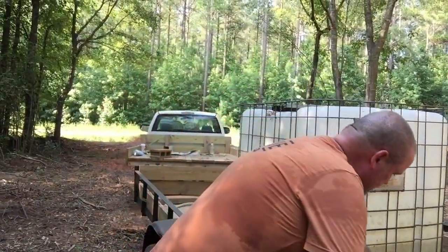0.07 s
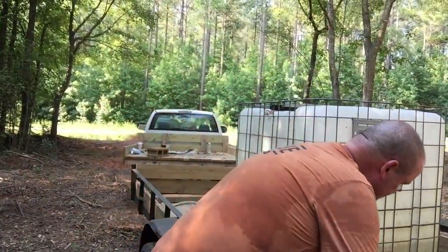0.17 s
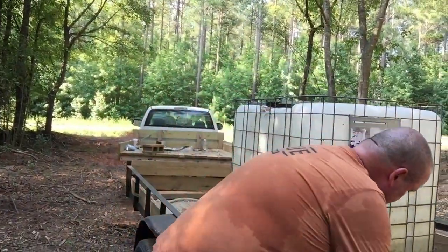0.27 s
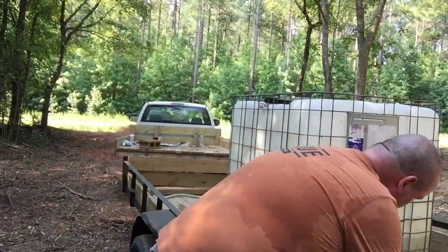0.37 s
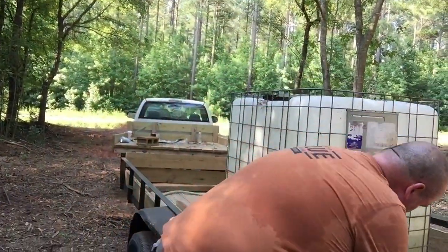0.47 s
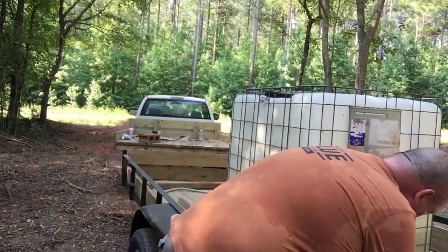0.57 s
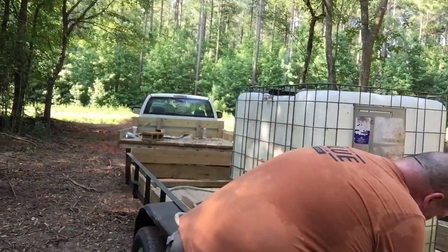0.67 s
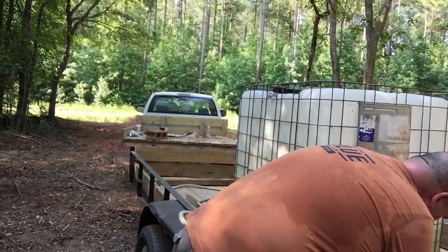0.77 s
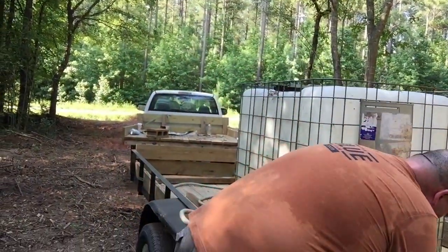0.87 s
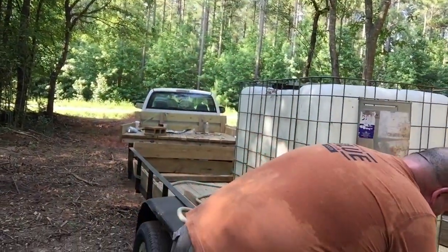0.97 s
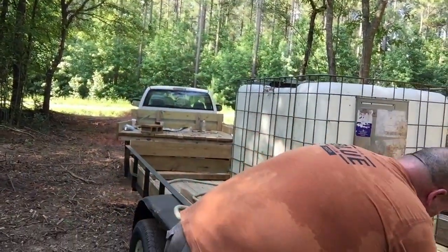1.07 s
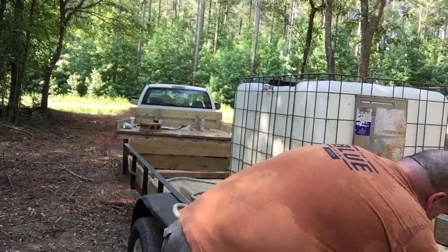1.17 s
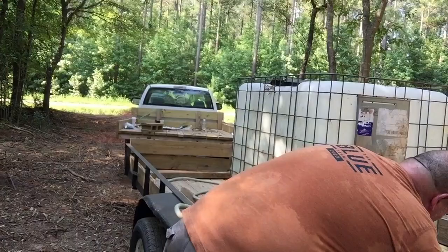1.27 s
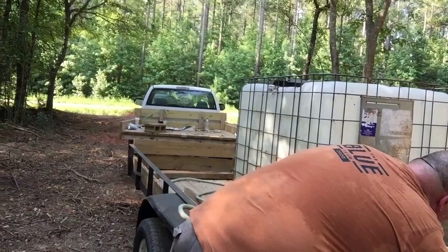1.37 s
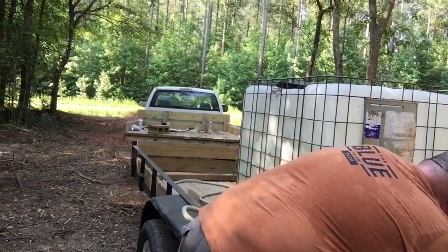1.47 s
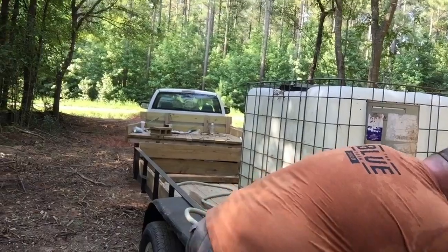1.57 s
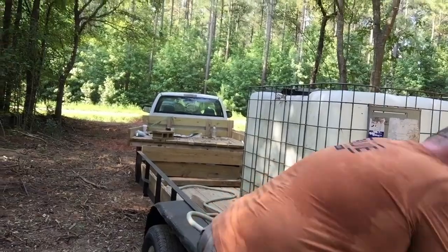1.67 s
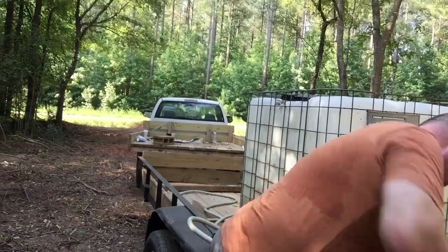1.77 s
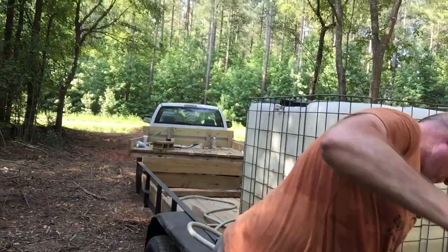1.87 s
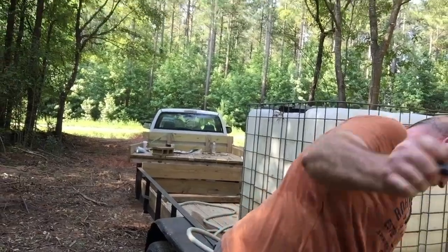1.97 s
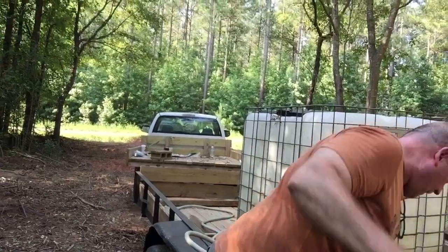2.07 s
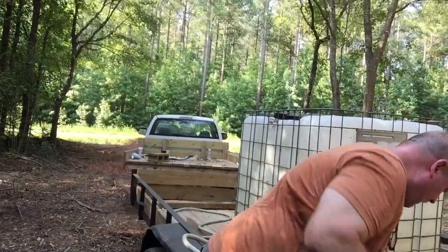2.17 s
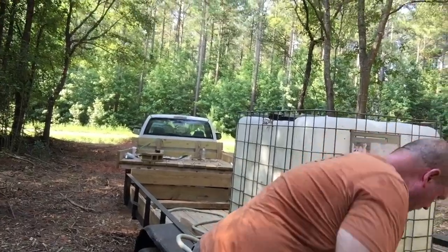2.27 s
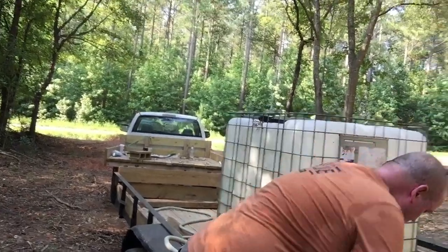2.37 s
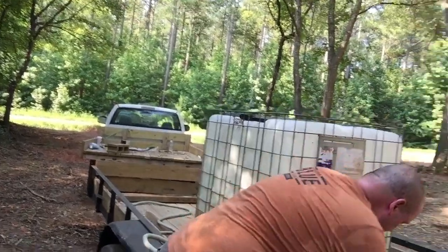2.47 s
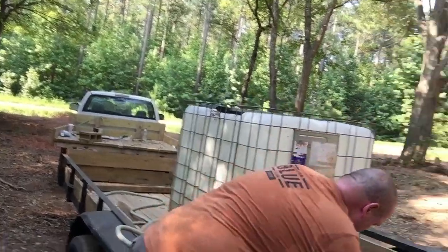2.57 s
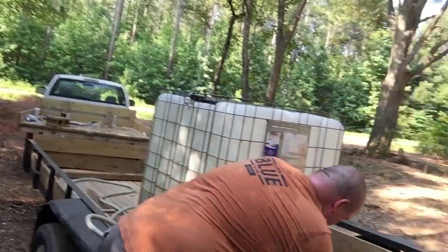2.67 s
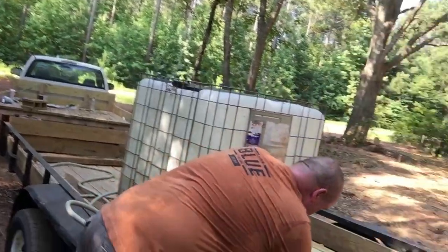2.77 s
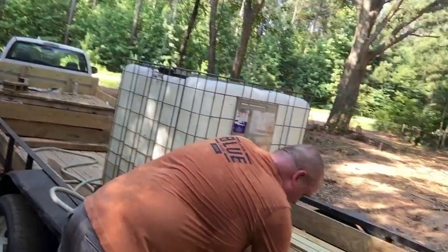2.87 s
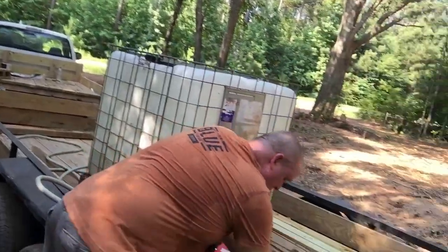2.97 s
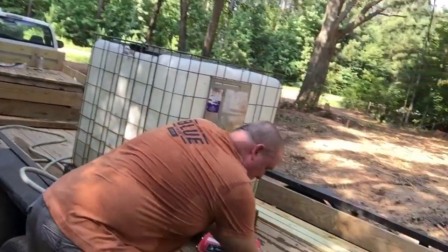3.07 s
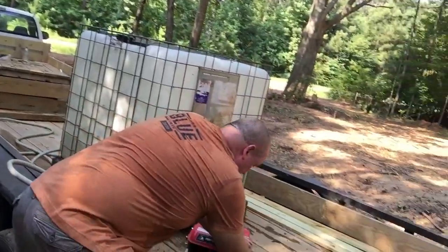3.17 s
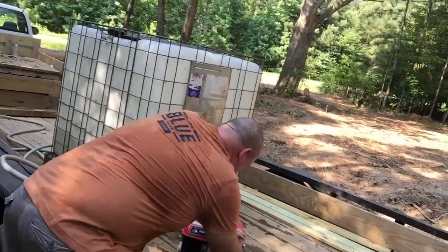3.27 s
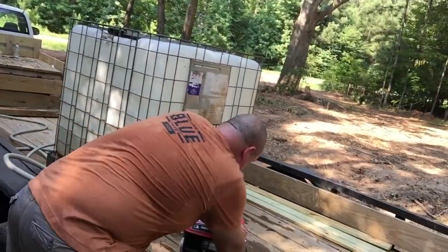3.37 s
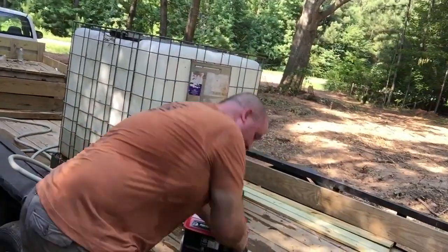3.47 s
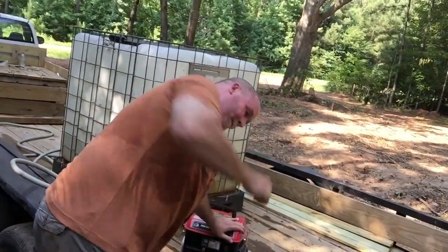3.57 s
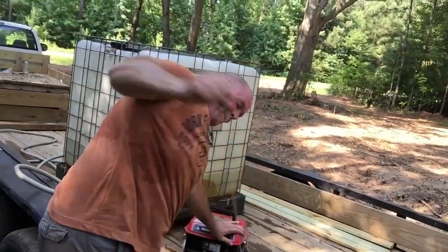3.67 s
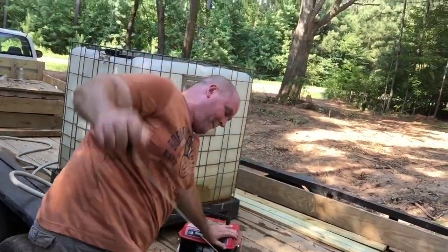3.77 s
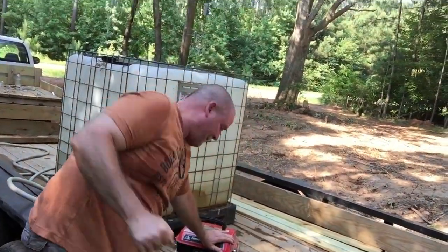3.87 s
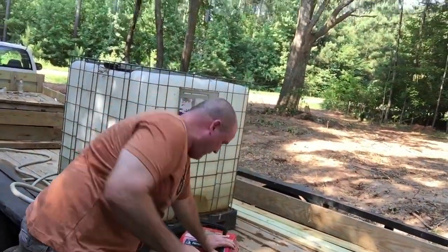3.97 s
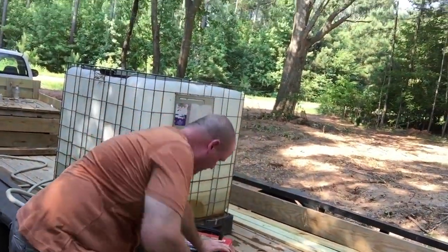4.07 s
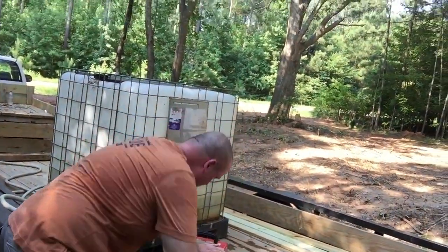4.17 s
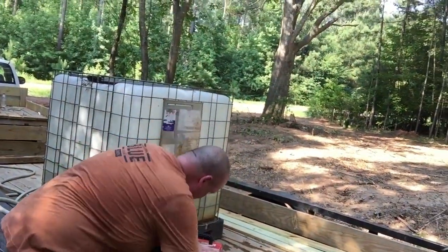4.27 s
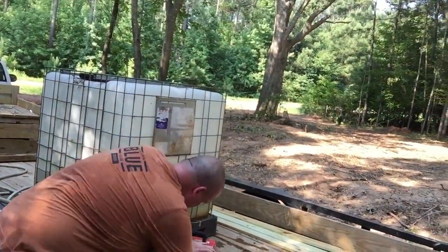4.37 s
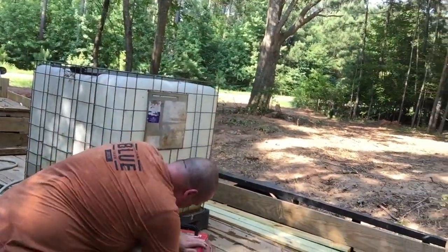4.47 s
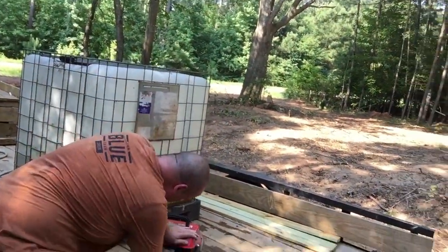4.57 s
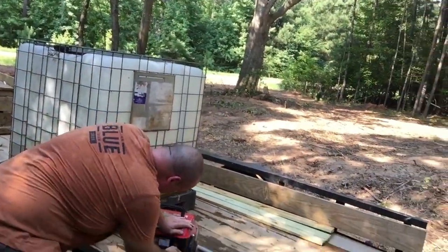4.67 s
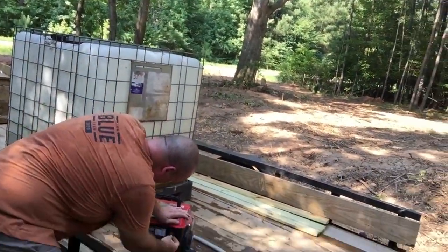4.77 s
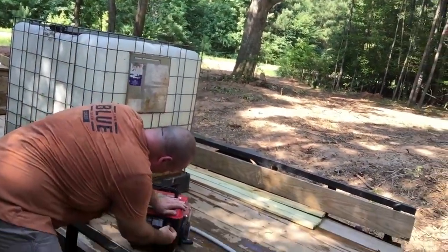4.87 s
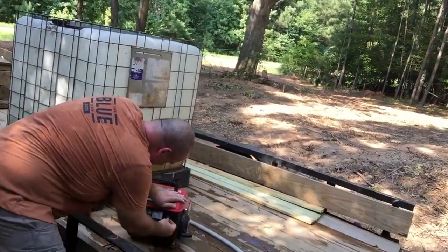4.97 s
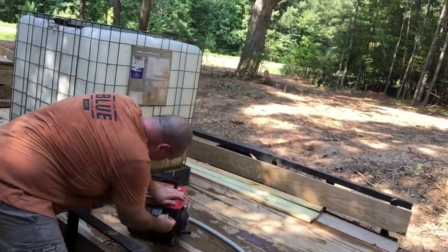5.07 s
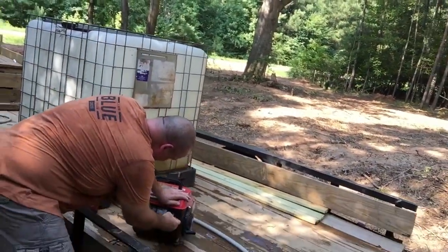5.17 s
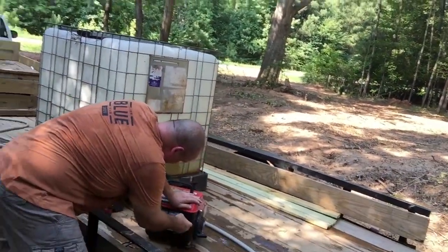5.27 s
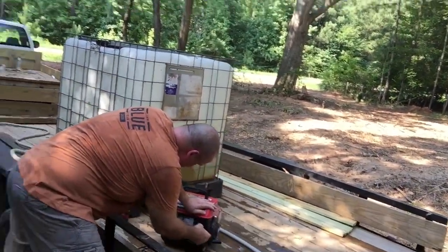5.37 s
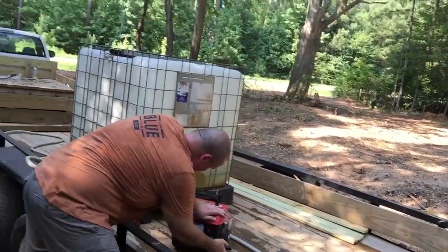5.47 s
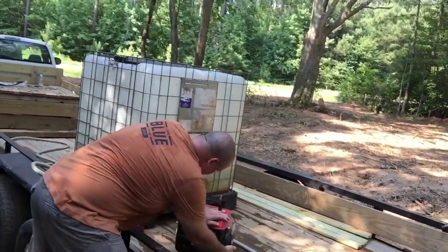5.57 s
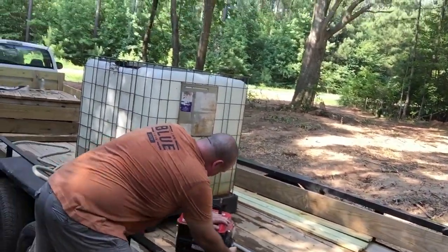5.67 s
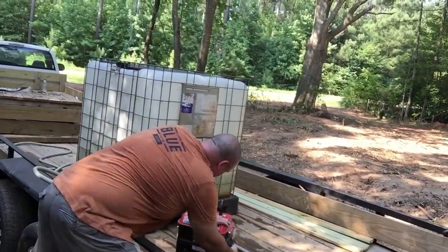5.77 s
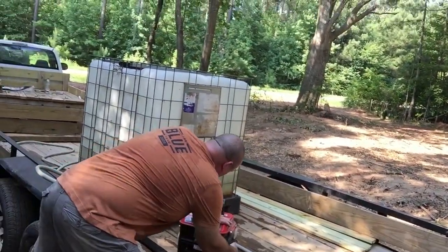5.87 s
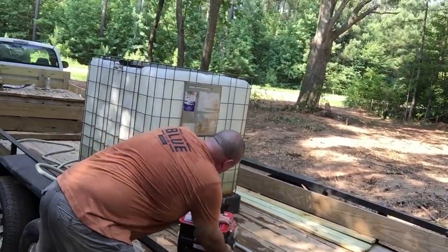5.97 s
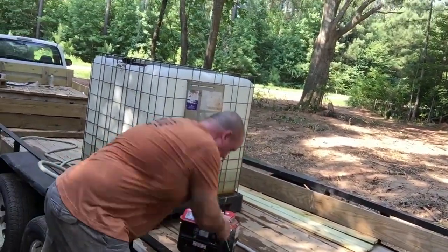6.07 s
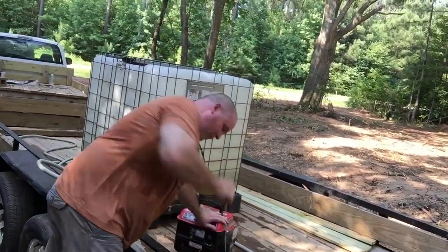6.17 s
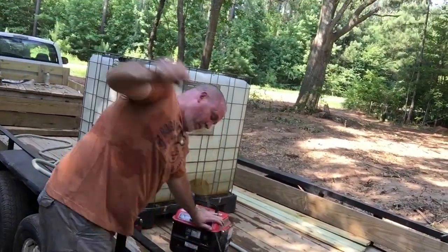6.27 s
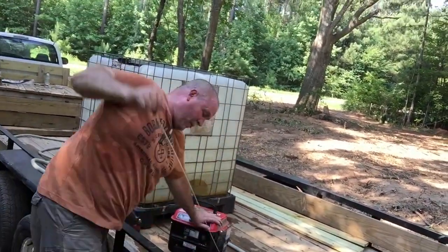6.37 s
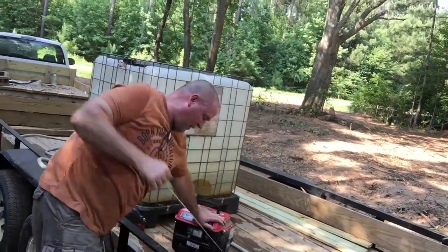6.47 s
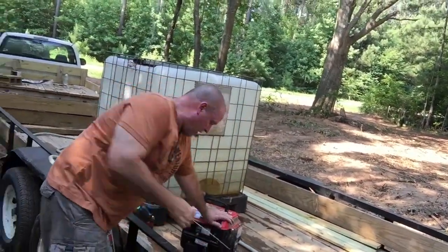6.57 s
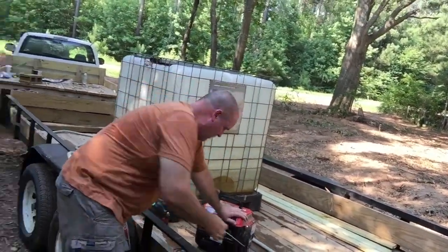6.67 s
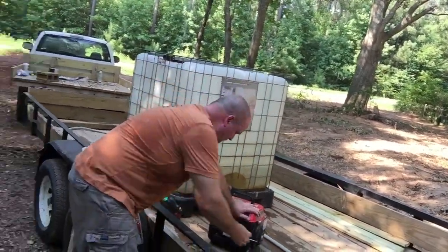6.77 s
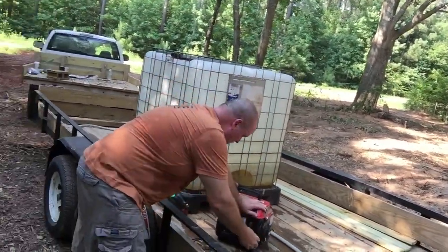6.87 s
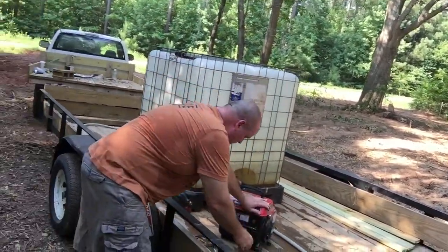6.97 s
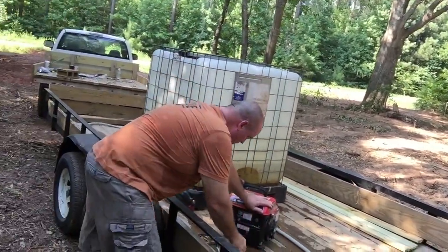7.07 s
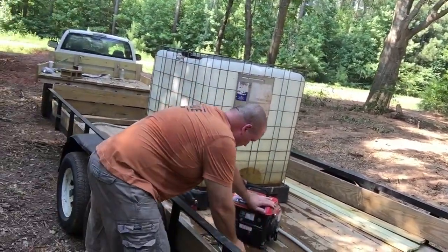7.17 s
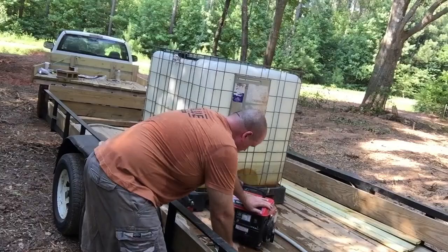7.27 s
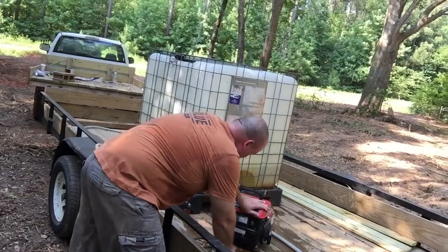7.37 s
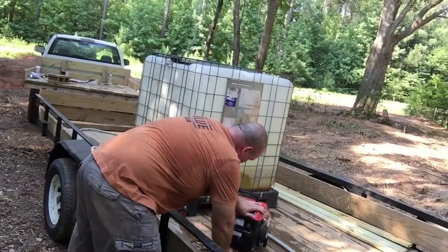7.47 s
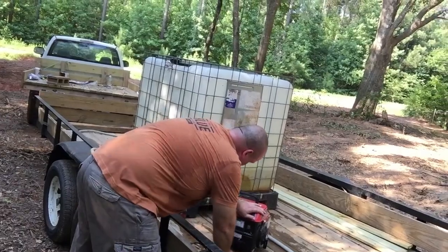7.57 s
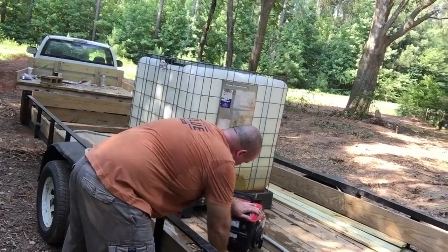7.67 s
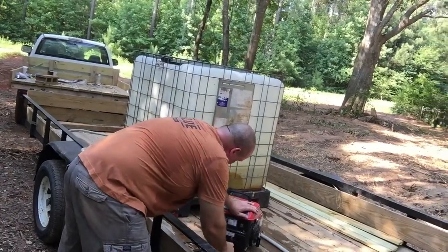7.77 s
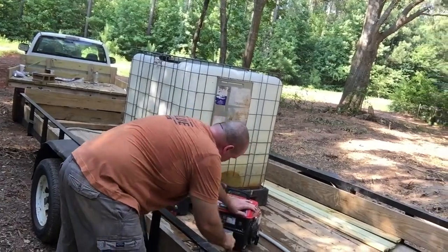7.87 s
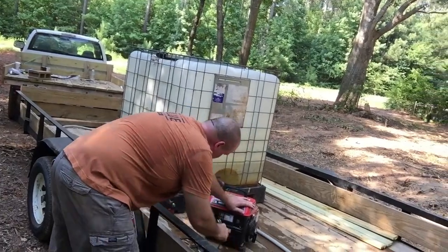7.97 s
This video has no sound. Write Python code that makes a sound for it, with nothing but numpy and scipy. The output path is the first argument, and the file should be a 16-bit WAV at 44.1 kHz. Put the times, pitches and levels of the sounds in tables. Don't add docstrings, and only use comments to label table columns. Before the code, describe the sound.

A small petrol engine is pull-started outdoors, two rasping cranks sputtering down to silence, then a third catches, revs high and settles into running.

```python
import sys
import numpy as np
from scipy import signal
from scipy.fft import rfft, irfft
from scipy.io import wavfile
from scipy.ndimage import uniform_filter1d

SR = 44100
rng = np.random.default_rng(int(sys.argv[2]) if len(sys.argv) > 2 else 0)


def persist_wave(psi):
    counts = np.round(np.clip(psi, -1, 1) * 32767).astype(np.int16)
    wavfile.write(sys.argv[1], SR, np.atleast_2d(counts).T)


def voltage_ratio(decibels):
    exponent = np.asarray(decibels, float) / 20
    return 10 ** exponent


N = 352800


def unit(x):
    return x / np.sqrt(np.mean(x ** 2) + 1e-20)


def noise(n=N):
    return rng.standard_normal(n)


def filtered(x, order, hz, kind="low"):
    return signal.sosfilt(signal.butter(order, hz, kind, fs=SR, output="sos"), x)


def smooth(x, length_s):
    return uniform_filter1d(x, int(length_s * SR))


def swell(x, length_s):
    bump = signal.windows.hann(int(length_s * SR))
    return signal.fftconvolve(x, bump / bump.sum())[:N]


def curve(rows, column, outside=-120):
    rows = np.array(rows)
    return np.interp(np.arange(N) / SR, rows[:, 0], rows[:, column], outside, outside)


def drift(rate_hz):
    sos = signal.butter(2, rate_hz, fs=SR / 20, output="sos")
    slow = signal.sosfilt(sos, noise(N // 20 + 3001))[3000:]
    return np.interp(np.arange(N) / 20, np.arange(len(slow)), unit(slow))


def clicks(times, sizes):
    out = np.full(N, 1e-18)
    np.add.at(out, np.clip((np.asarray(times) * SR).astype(int), 0, N - 1), sizes)
    return out


def ring(x, hz, t60_s):
    r, w = voltage_ratio(-60 / (t60_s * SR)), 2 * np.pi * hz / SR
    return signal.lfilter([0, np.sin(w)], [1, -2 * r * np.cos(w), r * r], x)


def body(x, modes):
    def through(v):
        return sum(voltage_ratio(db) * ring(v, hz, np.log(1000) / np.pi / width) for hz, width, db in modes)
    return through(x) / np.sqrt(np.sum(through(clicks([0], 0.84)[:8192]) ** 2))


def coloured(spectrum, patchy_db):
    log_hz = np.log(np.maximum(np.arange(N // 2 + 1) * SR / N, 1))
    at, level_db = np.log(np.array(spectrum)[:, 0]), np.array(spectrum)[:, 1]
    shaped = rfft(noise()) * voltage_ratio(np.interp(log_hz, at, level_db, -90, -90))
    octave = np.log(2)
    out = 0
    for centre in np.arange(at[0], at[-1] + octave, octave):
        share = np.clip(1 - abs(log_hz - centre) / octave, 0, 1)
        out = out + irfft(shaped * share, N) * voltage_ratio(patchy_db * drift(28.6))
    return unit(out)


# t/s, turns so far
FAILED_PULL_1 = [(1.785, 0), (1.886, 2), (1.968, 4), (2.048, 6), (2.138, 8), (2.245, 10), (2.38, 12),
                 (2.47, 13), (2.59, 14)]
FAILED_PULL_2 = [(3.564, 0), (3.609, 1), (3.648, 2), (3.683, 3), (3.744, 5), (3.806, 7), (3.872, 9),
                 (3.943, 11), (4.02, 13), (4.106, 15), (4.204, 17), (4.322, 19), (4.398, 20), (4.508, 21),
                 (4.61, 22)]
# t/s, speed/turns per s
RUN = [(6.18, 23.1), (6.27, 38.6), (6.39, 54.7), (6.49, 68.1), (6.606, 78.2), (6.67, 77.7), (6.87, 68.7),
       (7.132, 60.5), (7.338, 58.2), (7.602, 61.1), (7.838, 61.0), (8.0, 60.2)]


def turn_times():
    coasting = []
    for pull in (FAILED_PULL_1, FAILED_PULL_2):
        s, turns = np.transpose(pull)
        fit, every = np.polyfit(turns, s, deg=7), np.arange(turns[-1] + 1)
        misfit = np.interp(every, turns, s - np.polyval(fit, turns))
        coasting += list(np.polyval(fit, every) + misfit)
    angle = np.cumsum(curve(RUN, 1, outside=0)) / SR
    firing = np.flatnonzero(np.diff(np.floor(angle), prepend=0)) / SR
    times = np.concatenate([coasting, [RUN[0][0]], firing])
    return times, np.arange(len(times)) >= len(coasting), angle


# t/s, level/dB
BURN = [(6.18, 3), (6.25, 9.5), (6.32, 9.5), (6.37, 7.5), (6.43, 3), (6.49, 4), (6.54, 5), (6.6, 2),
        (6.65, 1), (6.89, 2.5), (7.02, 0.5), (7.46, 1.5), (8.0, 2.5)]
# level/dB at 25 turns per s, slope/dB per dB of speed
COASTING = [
    (-18, 1.68),
    (-16.5, 1.06),
    (-30.5, 1.34),
    (-27.5, 1.5),
]
# level/dB at 60 turns per s, slope/dB per dB of speed, slope/dB per dB of burn
FIRING = [
    (-21.5, 1.5, 1),
    (-23.5, 2, 0.57),
    (-23.5, 1.97, 1.69),
    (-33, 1.3, 1.65),
]
# t/s, extra rattle/dB
DRAG = [(1.68, 5), (1.74, -3.5), (1.85, 2.5), (2.08, -2), (2.3, 2.5), (2.6, -5), (3.48, 3), (3.56, 2),
        (3.7, -1), (3.83, -1.5), (3.9, -6), (4.08, -5), (4.2, -2), (4.6, 2)]


def levels(times):
    bite_turns_per_s, rest_turns_per_s, settle_s = 14.4, 3.4, 0.2
    t, speed = np.arange(N) / SR, np.full(N, 1e-3)
    pulls = np.split(times, np.flatnonzero(np.diff(times) > .5) + 1)
    for (bite, _), turns in zip(BITES, pulls):
        s = [bite, *turns, turns[-1] + settle_s]
        turns_per_s = [bite_turns_per_s, *(1 / np.gradient(turns)), rest_turns_per_s]
        speed += np.interp(t, s, turns_per_s, 0, 0)
    burn_db, drag_db = curve(BURN, 1, outside=0), curve(DRAG, 1, outside=0)
    coasting = [db + slope * 20 * np.log10(speed / 25) for db, slope in COASTING]
    firing = [db + slope * 20 * np.log10(speed / 60) + share * burn_db for db, slope, share in FIRING]
    thump_db, puff_db, rattle_db, fan_db = np.where(t < RUN[0][0], coasting, firing)
    return thump_db, puff_db, rattle_db + drag_db, fan_db + 0.26 * drag_db


# f/Hz, width/Hz, level/dB
MUFFLER = [
    (80, 20, -5),
    (120, 38, 3),
    (201.5, 25, -4.5),
    (252.4, 66, -3),
]


def exhaust(times, fired, period, stroke_db, uneven_db, thump_db):
    at = (times * SR).astype(int).clip(0, N - 1)
    state_db = np.where(fired, -8, -1.5 - 4.4 * (period > .14))
    level_db = thump_db[at] + state_db + stroke_db + uneven_db * noise(len(times))
    thump = swell(clicks(times - .009, np.sqrt(period * SR) * voltage_ratio(level_db)), 0.0033)
    out = np.zeros(N)
    for k, (hz, width, db) in enumerate(MUFFLER):
        late = int(.007 * max(k - 1, 0) * SR)
        out += voltage_ratio(db - 2.5) * np.pad(body(thump, [(hz, width, 0)]), (late, 0))[:N]
    return filtered(out, 2, 58, "high")


# f/Hz, width/Hz, level/dB
AIR_BOX = [(297, 22, -1), (316, 18, -9), (352, 26, 4)]
# f/Hz, width/Hz, level/dB
CHOKED_BOX = [(281, 52, -11.5), (318.4, 48, 2.5), (347, 54, -5)]


def intake(times, fired, period, stroke_db, uneven_db, puff_db):
    at = (times * SR).astype(int).clip(0, N - 1)
    coast_lag = np.maximum(.016, 0.1634 * period) + .0012 * noise(len(times))
    lag = np.where(fired, 0.451 * period, coast_lag)
    state_db = np.where(fired, -5, -1.5 - 16.0 * (period > .14))
    level_db = puff_db[at] + state_db - stroke_db + uneven_db * noise(len(times))
    puff = clicks(times + lag, np.sqrt(period * SR) * voltage_ratio(level_db))
    puff = swell(puff, 0.005) * (2.2 + 2.0 * noise())
    puff = body(puff, [(366, 46, 0)]) * 0.11
    running = np.arange(N) >= RUN[0][0] * SR
    return body(puff * running, AIR_BOX) + voltage_ratio(-0.3) * body(puff * ~running, CHOKED_BOX)


# f/Hz, width/Hz, level/dB
CASING = [(560, 79, 18.5), (750, 30, 13), (900, 600, -26), (1460, 1200, 29), (1620, 180, -27),
          (2050, 230, 21), (2780, 84, 11), (4200, 430, 15)]
# f/Hz, level/dB per Hz
CASING_WASH = [(330, 0), (450, -16), (757, -2), (971, -8.5), (2070, -13), (2520, -18.5), (2780, -15.5),
               (6000, -29.5), (7800, -85), (13200, -120)]
# f/Hz, width/Hz, level/dB
SHROUD = [(820, 300, 8), (880, 190, 13.5), (950, 97, 5), (1130, 290, 13.5), (1483, 245, 17),
          (1950, 250, 1.5), (2260, 100, 2), (2900, 150, 8.5), (3170, 50, -4), (4200, 350, 2)]


def casing(times, fired, period, rattle_db):
    lead_s, spread_s = 0.022, 0.037
    jolt = np.where(fired, .9, np.minimum(.07 / period, 1)) * voltage_ratio(2.2 * noise(len(times)))
    decay = voltage_ratio(-60 / (.05 * SR))
    shake = signal.lfilter([1], [1, -decay], clicks(times - lead_s * ~fired, jolt))
    shake = 1 + 80 * smooth(smooth(shake, spread_s), .012)
    shake = shake / np.sqrt(smooth(shake ** 2, .12))
    tap_sizes = np.tile(np.sqrt(period * SR), 2) * voltage_ratio(2.0 * noise(2 * len(times)))
    taps = clicks(np.append(times, times + .37 * period), tap_sizes)
    loose = (rng.random(N) < 700 / SR) * noise() * 13.0
    knocking = unit(0.41 * taps + loose)
    metal = unit(body(knocking + 0.5 * noise(), CASING))
    metal = unit(metal + voltage_ratio(3.0) * coloured(CASING_WASH, patchy_db=1.0))
    starter = np.interp(np.arange(N) / SR, [6.17, 6.27], [1, 0])
    metal = metal + 2.6 * starter * unit(body(knocking + noise(), SHROUD))
    return voltage_ratio(rattle_db + 2.5) * shake * unit(metal)


# t/s, peak/dB
POPS = [
    (6.994, -19),
    (7.039, -27.5),
    (7.1, 4.5),
    (7.167, -18),
    (7.214, 10),
    (7.283, 8),
    (7.333, 9),
    (7.388, -41),
    (7.744, 0),
]
# t/s, peak/dB
ROCK_BACK = [
    (2.644, -17),
    (2.845, -20.5),
    (4.654, -15.5),
    (4.855, -16.5),
]


def pops():
    hard = clicks([s for s, db in POPS], [-voltage_ratio(db - 10.5) for s, db in POPS])
    last = clicks([s for s, db in ROCK_BACK], [voltage_ratio(db + 2.0) for s, db in ROCK_BACK])
    return swell(ring(hard, 147, 0.012) + ring(hard, 377, 0.033) + ring(last, 315, 0.07), 0.0033)


def engine(times, fired, thump_db, puff_db, rattle_db):
    period = np.clip(np.diff(times, append=times[-1] + 0.051), 0, .15)
    uneven_db = np.where(fired, 3.0, 1.5)
    times = times + noise(len(times)) * np.where(fired, .0007, .0002)
    stroke_db = np.where(fired, 1.4 * (-1) ** np.arange(len(times)), 0)
    turn = times, fired, period
    out = exhaust(*turn, stroke_db, uneven_db, thump_db) + intake(*turn, stroke_db, uneven_db, puff_db)
    return out + casing(*turn, rattle_db) + pops()


# f/Hz, width/Hz, level/dB
CHUFF = [(784, 130, 6), (950, 100, -1.5), (1130, 190, -2.5), (1560, 176, -3), (2000, 83, -9),
         (3220, 330, -12), (4200, 210, -1.5)]


def chuffs(times, fired, rattle_db):
    level_db, length_s, slope = -29.5, 0.032, .6
    turns = times[~fired]
    fall_db = rattle_db[(turns * SR).astype(int)] - COASTING[2][0]
    sizes = voltage_ratio(level_db + slope * fall_db + 1.2 * noise(len(turns)))
    breath = signal.windows.hann(int(length_s * SR))
    gate = signal.fftconvolve(clicks(turns - length_s * 0.48, sizes), breath)[:N]
    gate += voltage_ratio(level_db - 23.5) * uniform_filter1d((gate > 0) * 1., size=4096)
    return gate * unit(body(noise(), CHUFF))


# multiple, level/dB at 60 turns per s, slope/dB per dB of speed,
# slope/dB per dB of burn, build-up/turns
MAIN_ORDERS = [(1, -30, 4.5, 3.5, 42), (2, -25, 4, 2.12, 1), (3, -32, 4.5, 1.78, 2.5),
               (4, -32.5, 2, 3.3, 18), (5, -34, 2, 0.85, 2.5), (6, -34, 0.4, 1.88, 2.3),
               (7, -38.5, -1.6, 1.6, 2.5), (8, -48, 5, 3.5, 1.6), (10, -41, -1.8, 1.16, 1.4),
               (12, -49, 2, 0, 3.1), (13, -41.5, -1.5, 0.05, 4.1)]
# multiple, level/dB re intake
SIDE_ORDERS = [(1.5, -7.5), (2.5, -20), (3.5, -13), (4.5, -15.5), (5.5, -17.5), (6.5, -17), (9, -33.5),
               (12.5, -22)]
# f/Hz, width/Hz, level/dB
DECK_PEAKS = [(143, 20, -4), (301, 3.8, 3), (357.5, 9.3, 6), (575, 28, 4), (749, 33, 11.5)]
# t/s, level/dB on upper multiples
STEADY = [
    (6.18, -2),
    (6.9, -3.5),
    (7.02, -16.5),
    (7.28, -3.5),
    (7.45, -1.5),
    (8.0, -3.5),
]
# t/s, factor
CATCH_WOBBLE = [(6.18, 3), (6.6, 2.5), (6.8, 1), (7.05, 2), (7.4, 1), (8.0, 1)]


def orders(angle, intake_db):
    speed = curve(RUN, 1, outside=1)
    speed_db = 20 * np.log10(speed / 60)
    burn_db, wobble = curve(BURN, 1, outside=0), curve(CATCH_WOBBLE, 1, outside=0)
    steady_db = curve(STEADY, 1, outside=0)
    angle = angle + .006 * wobble * drift(25) * (angle > 0)
    rows = [(round(k), db + slope * speed_db + share * burn_db, turns)
            for k, db, slope, share, turns in MAIN_ORDERS]
    rows += [(round(2 * k) / 2, intake_db + db, 2.3) for k, db in SIDE_ORDERS]
    first, out = int(RUN[0][0] * SR), np.zeros(N)
    for k, db, turns in rows:
        deck_db = sum(top_db / (1 + ((k * speed[first:] - hz) / width) ** 2)
                      for hz, width, top_db in DECK_PEAKS)
        level_db = (db + (k > 1) * steady_db + wobble * 0.98 * drift(9.8))[first:] + deck_db
        build_up = np.clip(angle[first:] / turns, 0, 1) ** 2
        hum = np.sin(2 * np.pi * k * angle[first:] + k * k)
        out[first:] += np.sqrt(2) * voltage_ratio(level_db) * build_up * hum
    return out


# multiple, level/dB re thump
COAST_ORDERS = [(2, -18), (3, -8), (4, -11), (5, -26), (6, -20), (9, -1.5)]


def coast_orders(times, thump_db):
    t = np.arange(N) / SR
    angle = np.interp(t, times, np.arange(len(times)))
    turning = (np.gradient(angle) * SR > 8) & (thump_db >= -60) & (t < RUN[0][0])
    hum = sum(voltage_ratio(thump_db + db - 6.0) * np.sin(2 * np.pi * round(k) * angle + k * k)
              for k, db in COAST_ORDERS)
    return uniform_filter1d(turning * 1., size=2048) * hum


# t/s, level/dB
BITES = [
    (1.678, -26.5),
    (3.478, -25.5),
    (6.091, -23),
]


def bites():
    out, t = np.zeros(N), np.arange(4096) / SR
    falling_hz = 420 + 1000 * np.exp(-t / 0.016)
    tone = np.sin(2 * np.pi * np.cumsum(falling_hz) / SR)
    for s, db in BITES:
        rough = unit(filtered(noise(4096), 2, 260))
        out[int(s * SR):][:4096] += voltage_ratio(db - 60 * t / 1.2) * rough * tone
    return out


# t/s, peak/dB, extra/dB at 2.3 kHz, extra/dB at 2.8 kHz
CLANKS = [
    (4.509, -11, 3, -6),
    (4.581, -26, -3, -5),
    (6.946, -11, -8, 2),
    (6.983, -17, -2, 1),
    (7.023, -17, -6, -3),
    (7.136, -25, -6, 2),
]
# f/Hz, level/dB, t60/s
HOUSING = [(990, -20, 0.028), (1556, 9.5, 0.04), (1810, -3, 0.019), (2100, -25, 0.04), (2320, 10.5, 0.02),
           (2513, -1, 0.035), (2720, -4.5, 0.095), (2880, 9.5, 0.017), (3520, -4, 0.03),
           (3830, -0.5, 0.034), (4245, 10, 0.0087), (4800, -44, 0.033), (5600, -24, 0.034), (6880, -7, .04)]


def handle_clanks():
    s, db, low_db, high_db = np.transpose(CLANKS)
    contact_s, out = np.array([0, .003, .007, .012]), np.zeros(N)
    for hz, mode_db, t60_s in HOUSING:
        where_db = low_db * (2150 < hz < 2450) + high_db * (2600 < hz < 3100)
        spread_db = 2.5 * noise((len(s), 4)) + 1.5 * noise((len(s), 1)) - [3, 0, 1, 7]
        sizes = voltage_ratio((db + where_db)[:, None] + mode_db - 9 + spread_db)
        chatter = s[:, None] + contact_s * rng.uniform(0.46, 1.3, (len(s), 4))
        out += ring(clicks(chatter.ravel(), sizes.ravel()), hz, t60_s)
    return out


# t/s, peak/dB, f/Hz of body
PAWLS = [
    (1.6725, -7.5, 4200),
    (2.05, -1, 1560),
    (3.471, 2.5, 815),
    (3.7179, -5.5, 850),
    (3.7841, 6.5, 3800),
    (6.0876, -0.5, 920),
    (6.358, 9, 2780),
]
# t/s, peak/dB, f/Hz of body
TAPS = [(1.05, -37, 880), (1.068, -30, 950), (0.989, -32.5, 840), (1.129, -39, 840), (1.393, -33, 700),
        (1.834, -16, 900), (2.57, -46, 2000), (2.7211, -29, 1650), (3.3064, -32, 3800), (3.36, -34, 4330),
        (3.443, -29, 1620), (3.6108, -14, 1130), (4.457, -29, 1290), (1.762, -24.5, 2170),
        (5.3195, -40, 1750), (5.583, -37, 1880)]
# t/s, peak/dB, f/Hz of body
FLICKS = [
    (1.368, -26.5, 1540),
    (3.246, -22.5, 1950),
    (4.2477, -18, 900),
    (4.807, -30, 1050),
    (6.0686, -20, 1540),
    (6.287, -5, 1370),
    (6.983, 2, 2100),
]
# t/s, peak/dB, f/Hz of body
CLICKS = [(2.943, -30.5, 1160), (3.0658, -30.5, 2590), (3.1313, -29.5, 1820), (3.2042, -33, 1270),
          (5.698, -46, 1950)]
# body/dB, bright/dB, t60/s, attack/s, ring/cycles
TICK_KINDS = [
    (-22, -20, 0.053, 0.001, 2.8),
    (-8, -22, 0.064, 0.0026, 9.8),
    (-20, -10.5, 0.056, 0.0045, 8.6),
    (-18.5, -13, 0.037, 0.018, 7.3),
    (-8, -13, 0.014, 0.0015, 9.9),
]


def ticks():
    out, t = np.zeros(N + 8192), np.arange(8192) / SR
    cracks = [(s, db + 9, 1540) for s, db, *_ in CLANKS]
    for table, kind in zip((PAWLS, TAPS, FLICKS, cracks, CLICKS), TICK_KINDS):
        body_db, bright_db, t60_s, attack_s, cycles = kind
        envelope = voltage_ratio(-60 * t / max(t60_s, .005)) * np.minimum(t / attack_s, 1)
        gains = voltage_ratio([body_db + 12.0, min(body_db, bright_db) + 10.0, bright_db + 6.5])
        for s, db, hz in table:
            burst = noise((3, 8192)) * envelope
            parts = (ring(burst[0], hz, cycles / hz),
                     filtered(burst[1], 2, [2500, 6500], "band"),
                     filtered(burst[2], 2, 6000, "high"))
            out[int(s * SR):][:8192] += voltage_ratio(db) * sum(g * p / abs(p).max() for g, p in zip(gains, parts))
    return out[:N]


# t/s, peak/dB
PAWL_RINGS = [
    (3.787, -20),
    (6.359, -25),
]


def pawl_rings():
    s, db = np.transpose(PAWL_RINGS)
    jolts = clicks(s, voltage_ratio(db - 2.0))
    return ring(jolts, 5822 - 2, .3) + ring(jolts, 5822 + 2, .3)


# t/s, peak/dB, f/Hz, t60/s
PINGS = [(3.066, -36, 1900, .012), (3.066, -35, 2900, .012), (3.067, -38, 4100, .015),
         (3.247, -40, 3250, .02), (3.33, -38, 4150, .02), (3.33, -36, 1800, .02), (3.362, -40, 4300, .02),
         (2.67, -42, 4200, .03), (6.946, -11.5, 2800, .06), (6.984, -20, 4320, .03),
         (6.984, -14, 2000, 0.028), (7.137, -23, 2770, .05), (6.37, -26, 5800, .12),
         (1.207, -39, 3810, 0.038), (1.207, -45, 4350, .02), (1.207, -40, 1700, .02),
         (1.5, -42, 2800, .008), (1.512, -32, 1600, 0.033), (1.513, -34.5, 3220, 0.019),
         (1.516, -44, 2500, .02), (4.511, -32, 2300, .05), (6.95, -7, 1540, 0.083), (.575, -40, 900, .02),
         (1.62, -41, 1560, .04), (3.8, -30, 5700, .1), (4.632, -41, 2850, 0.052), (4.742, -41, 2840, 0.037),
         (4.81, -46, 2850, 0.033), (2.515, -41, 1950, .06), (2.57, -38, 1900, .03), (5.322, -40, 1700, .03),
         (5.585, -33, 1300, 0.014), (5.585, -40, 2050, .025), (5.568, -34, 4230, .02),
         (5.652, -42, 4200, .03), (5.701, -38, 1750, .02), (5.755, -44, 1560, .02),
         (5.84, -50, 1900, 0.014), (5.857, -51, 4100, .02), (1.675, -24, 3030, .03),
         (1.675, -24, 3880, 0.017), (1.675, -27, 4460, 0.024), (3.786, -12, 5820, .03),
         (3.786, -24, 4080, .03), (3.786, -19, 6600, .025), (4.509, -22, 4200, 0.018),
         (4.581, -19.5, 3700, .02), (4.581, -23, 4240, .03)]


def pings():
    return sum(ring(clicks([s, s + 0.001516], voltage_ratio(db + 1.5)), hz, t60_s) for s, db, hz, t60_s in PINGS)


# t/s, peak/dB, f/Hz
KNOCKS = [(0.987, -18.5, 322), (1.127, -28, 368), (1.39, -22, 390), (1.06, -14.5, 141), (1.401, -10.5, 134),
          (1.837, -2.5, 343), (2.939, -20, 325), (3.499, -5, 460), (3.614, -3, 657), (3.809, -2, 540),
          (4.512, 1.5, 1026), (6.181, -3, 118)]


def deck_knocks():
    out = sum(ring(clicks([s], voltage_ratio(db - 8.5)), hz, 0.054) for s, db, hz in KNOCKS)
    return filtered(out, 2, 1300)


# t/s, length/s, level/dB, lower edge f/Hz
SWISHES = [(0, 0.093, -40, 3750), (0.127, 0.37, -52, 4000), (1.35, 0.049, -43, 2570),
           (1.623, 0.053, -43.5, 3000), (2.418, 0.06, -33.5, 4000), (3.15, 0.052, -38, 4800),
           (3.227, 0.18, -44, 2880), (3.448, 0.048, -26, 1330), (4.161, 0.12, -33, 6900),
           (4.742, 0.053, -36, 6960), (4.883, 0.028, -57, 1000), (4.942, 0.04, -49.5, 900),
           (4.992, 0.085, -39.5, 6130), (5.158, 0.064, -40, 4000), (5.504, 0.09, -40.5, 4330),
           (5.642, 0.038, -44.5, 4000), (5.862, 0.19, -30, 7300), (5.882, 0.13, -38, 1640)]


def swishes():
    out = np.zeros(N)
    for s, length_s, db, hz in SWISHES:
        n = int(length_s * SR)
        grainy = noise(16384) * np.repeat(voltage_ratio(4.2 * noise(256)), 64)
        bright = filtered(grainy, 2, [hz, min(4 * hz, 17000)], "band")[:n]
        out[int(s * SR):][:n] += voltage_ratio(db) * unit(bright) * signal.windows.hann(n) ** 0.52
    return out


# t/s, peak/dB, centre f/Hz
SNAPS = [(0.134, -22, 8650), (0.176, -11.5, 4580), (0.199, -14, 9100), (0.2186, -16, 8150),
         (0.2723, -11, 6100), (0.305, -5, 9300), (0.3105, -3.5, 8000), (0.352, -18, 8000),
         (0.392, -21.5, 4800), (0.2935, -36, 9100), (0.3147, -2.5, 11900), (0.337, -20, 8420),
         (0.378, -19, 8150), (0.415, -21, 8720), (0.6303, -12, 12400), (0.692, -16, 7400),
         (1.2694, -18, 12200), (1.4685, -17.5, 12800), (2.426, -7, 8760), (2.452, -2, 13000),
         (3.035, -13, 13900), (3.17, -17, 8000), (4.179, -8, 9100), (4.6624, -16, 9050),
         (4.8429, -20, 13300), (5.005, -21, 9200), (5.085, -15, 11500), (5.132, -23, 5900),
         (5.167, -18, 6040), (5.2776, -18, 8580), (5.36, -30, 4000), (5.3937, -23, 4730),
         (5.5687, -18, 7900), (5.907, -14, 13600), (5.909, -16, 5700), (.563, -24, 5600),
         (5.988, -15, 8870)]


def snaps():
    out, t = np.zeros(N + 1024), np.arange(1024) / SR
    envelope = voltage_ratio(-60 * t / 0.0055) + 0.45 * voltage_ratio(-60 * t / 0.028)
    for s, db, hz in SNAPS:
        burst = filtered(noise(1024) * envelope, 1, [hz / 1.2, min(hz * 1.2, 19000)], "band")
        out[int(s * SR):][:1024] += voltage_ratio(db - 8.5) * burst / abs(burst).max()
    sizes = (rng.random(N) < 110 / SR) * voltage_ratio(5.0 * np.minimum(rng.exponential(1, N), 4))
    dealt = rng.integers(0, 8, N)
    faint = sum(ring(sizes * (dealt == k) + 1e-18, hz, 30 / hz)
                for k, hz in enumerate(np.geomspace(6000, 14500, 8)))
    return out[:N] + voltage_ratio(curve(RUSTLE, 1) - 7.5) * unit(faint)


# t/s, level/dB
RUSTLE = [(0.0, -41), (0.2, -45.5), (0.6, -51.5), (1.58, -50), (2.65, -45), (2.96, -45), (3.27, -41.5),
          (4.68, -45), (5.0, -51.5), (5.33, -46.5), (5.93, -51.5), (8.0, -40)]
# f/Hz, level/dB per Hz
RUSTLE_COLOUR = [(1470, -1.5), (2500, -1.5), (2830, -1), (3230, -0.5), (4990, -6), (5780, -5), (9810, -3.5),
                 (13600, -7), (16000, -1.5)]
# f/Hz, width/Hz, level/dB
FAN_BANDS = [(6500, 750, -10.5), (13440, 870, -7)]


def rustle(fan_db):
    bands = sum(voltage_ratio(db + drift(3.3)) * unit(body(noise(), [(hz, width, 0)])) for hz, width, db in FAN_BANDS)
    level_db = np.maximum(curve(RUSTLE, 1), fan_db) - 6.5
    return voltage_ratio(level_db) * (coloured(RUSTLE_COLOUR, patchy_db=2.5) + bands)


def insects():
    return unit(ring(noise(), 8300, .004)) * voltage_ratio(-66 + 2.2 * drift(2.7))


# f/Hz, level/dB rms
IDLE_LINES = [(40, -54), (80.7, -39), (118, -46), (160, -49), (199.2, -47), (241, -51), (376.8, -49),
              (1050, -68)]
# f/Hz, level/dB per Hz
WOOD = [(15, -18), (25, -11), (55, 2), (86, 6.5), (150, -15), (211, -6), (265, -10.5), (374, -12.5),
        (439, -19), (745, -28), (1210, -40), (3380, -74), (6000, -91), (7800, -104), (13200, -120)]


def far_idle():
    t, lumps = np.arange(N) / SR, drift(11)
    wander = t + .00015 * drift(3)
    lines = np.zeros(N)
    for hz, db in IDLE_LINES:
        level_db = db + 2.5 * lumps * (hz < 150) + 2.5 * drift(4)
        lines += np.sqrt(2) * voltage_ratio(level_db) * np.sin(2 * np.pi * hz * wander + hz)
    fan = unit(body(noise(), [(700, 140, 15), (1050, 13, -17)]))
    fan = voltage_ratio(np.interp(t, [1.6, 4.5], [-56, -66])) * fan
    wood = voltage_ratio(-33.5 - 2.5) * coloured(WOOD, patchy_db=4.5)
    return fan + voltage_ratio(np.interp(t, [.8, 2.5], [-2.5, 1.5])) * (lines + wood)


# delay t/s, level/dB
ECHOES = [(.007, -14), (.019, -19.5), (0.031, -14.5), (.081, -36)]


def scene():
    times, fired, angle = turn_times()
    thump_db, puff_db, rattle_db, fan_db = levels(times)
    near = engine(times, fired, thump_db, puff_db, rattle_db) + chuffs(times, fired, rattle_db)
    near += bites() + handle_clanks() + ticks() + pawl_rings() + pings() + deck_knocks() + snaps()
    dull = filtered(near, 1, 4000)
    echoes = sum(voltage_ratio(db) * np.pad(dull, (int(s * SR), 0))[:N] for s, db in ECHOES)
    hum = orders(angle, puff_db) + coast_orders(times, thump_db)
    return (near + echoes + hum + swishes() + rustle(fan_db) + insects() + far_idle())[None]


def low_pass(x):
    return signal.sosfilt(signal.butter(12, 16810, fs=SR, output="sos"), x)


def record(dry):
    x = np.tanh(filtered(dry, 4, 48, "high"))
    x = signal.sosfilt(signal.cheby2(12, 35, 15900, fs=SR, output="sos"), x)
    return low_pass(x)


dry = scene()
out = record(dry)
persist_wave(out)
```